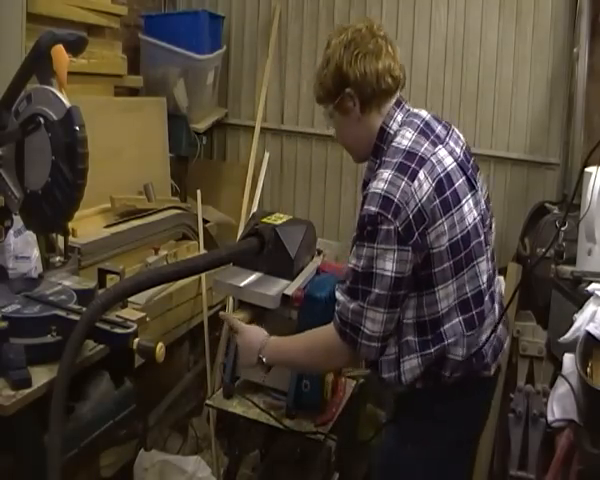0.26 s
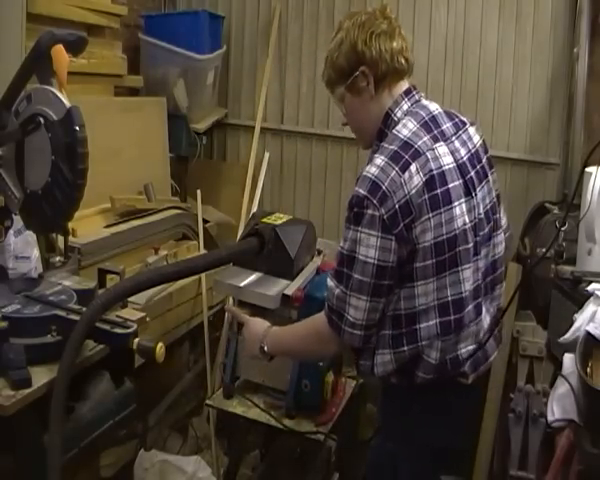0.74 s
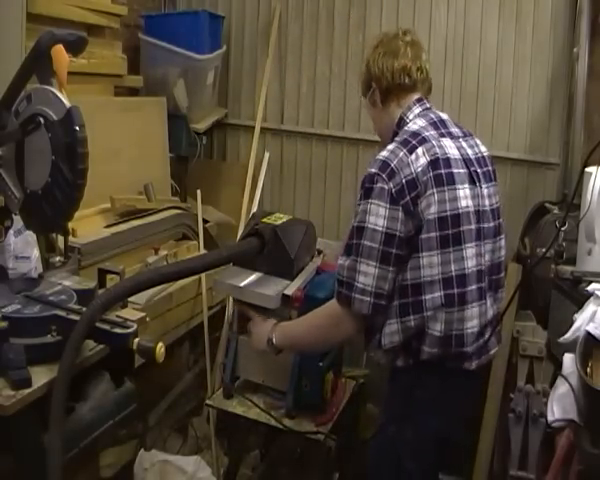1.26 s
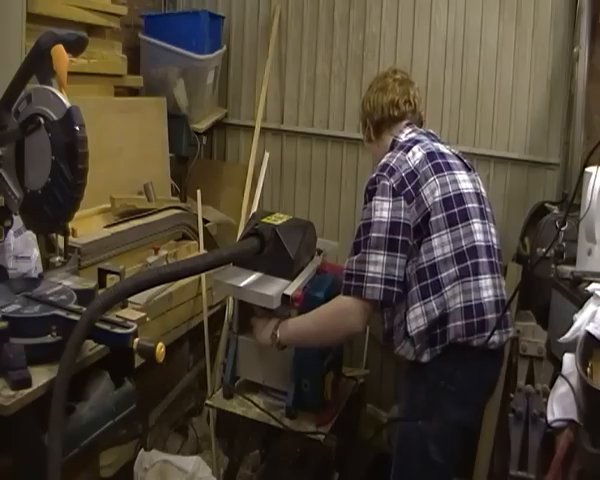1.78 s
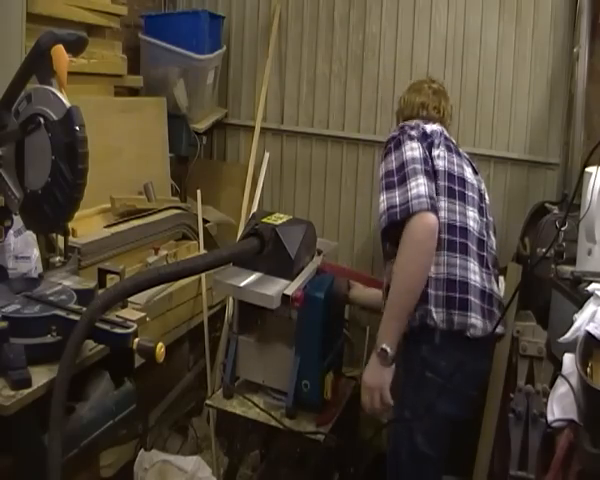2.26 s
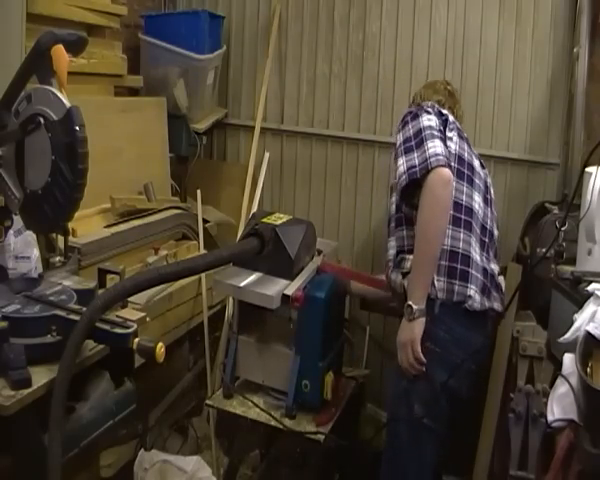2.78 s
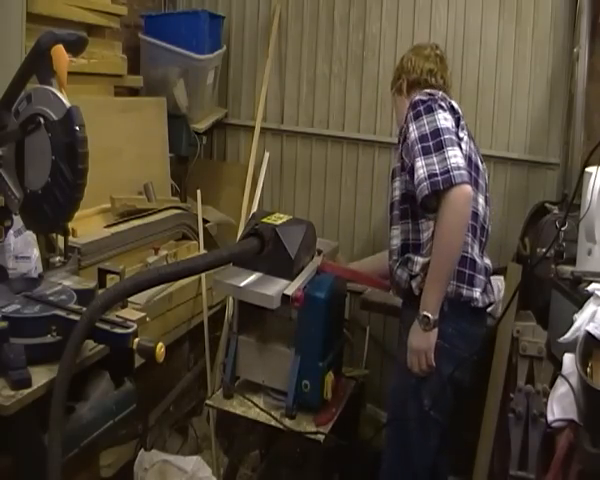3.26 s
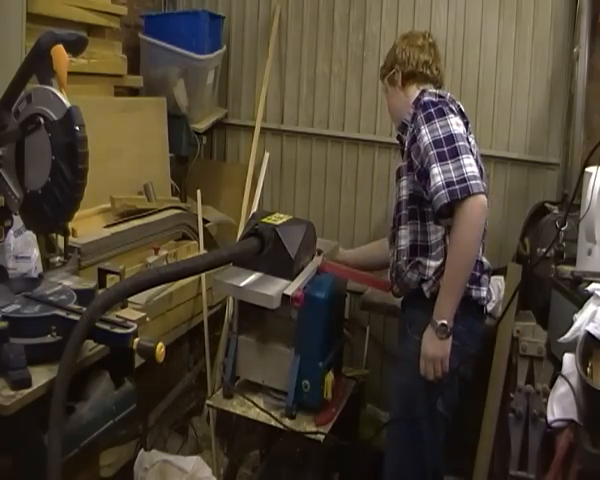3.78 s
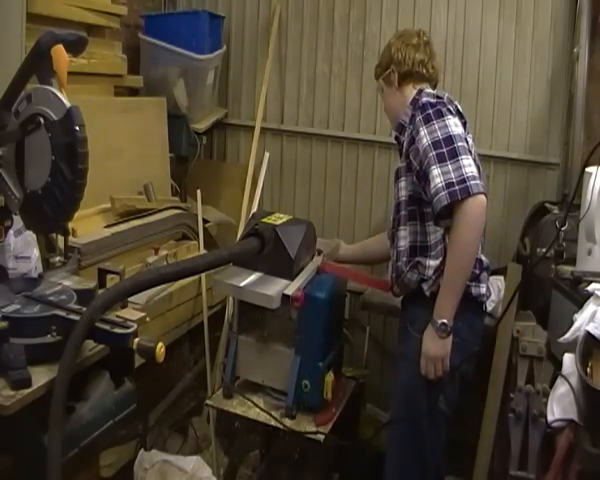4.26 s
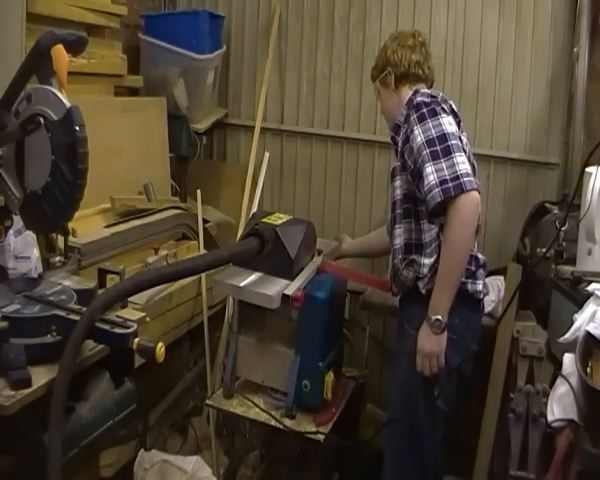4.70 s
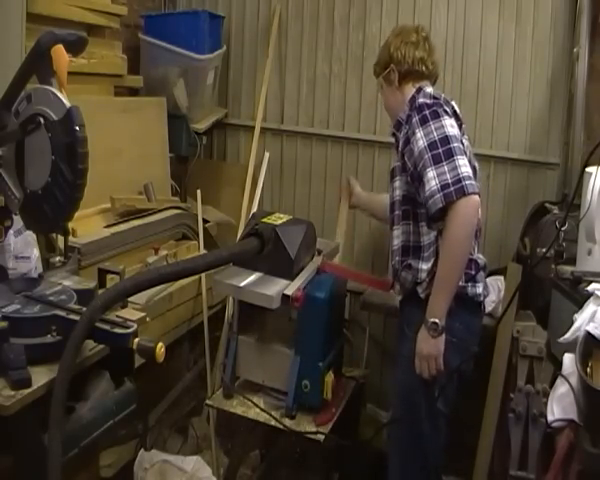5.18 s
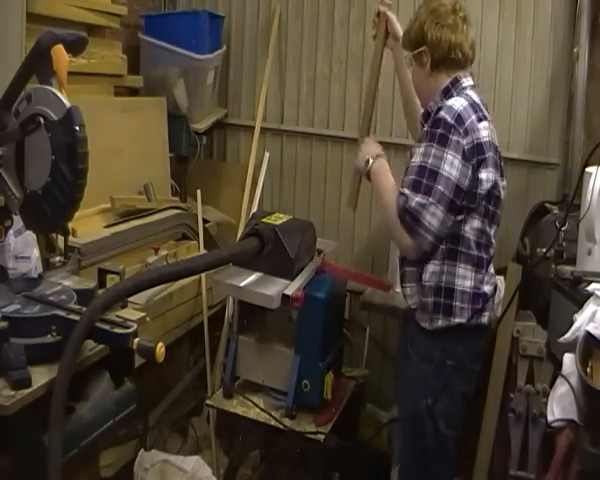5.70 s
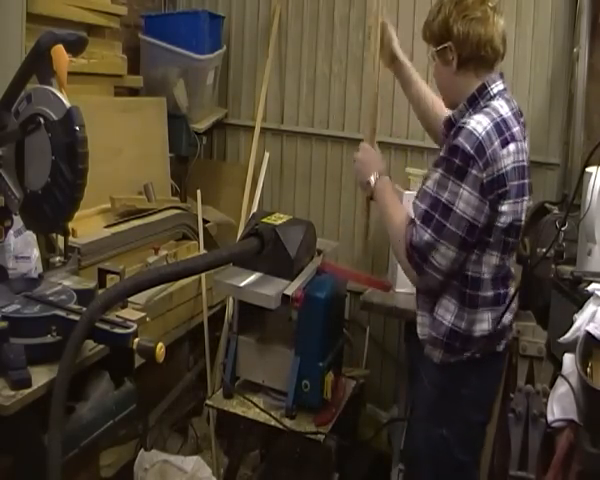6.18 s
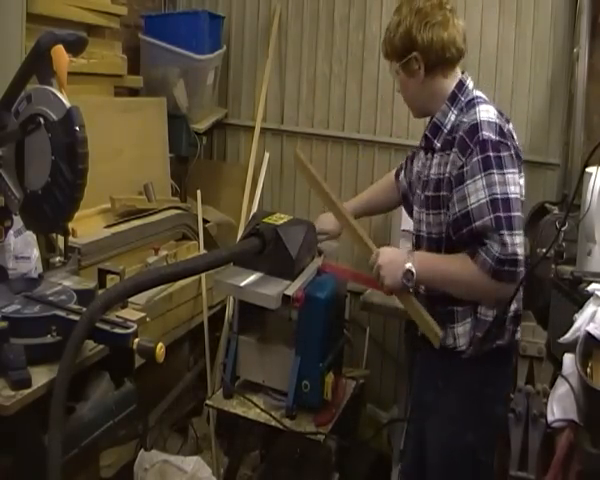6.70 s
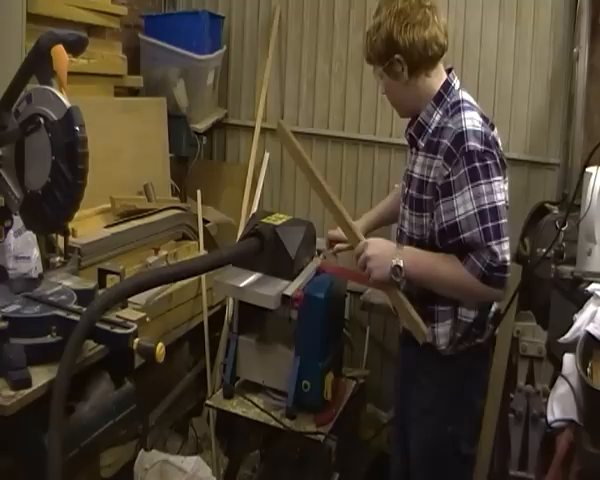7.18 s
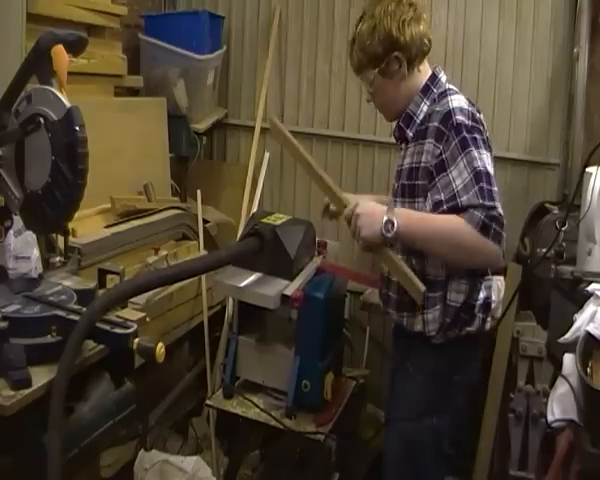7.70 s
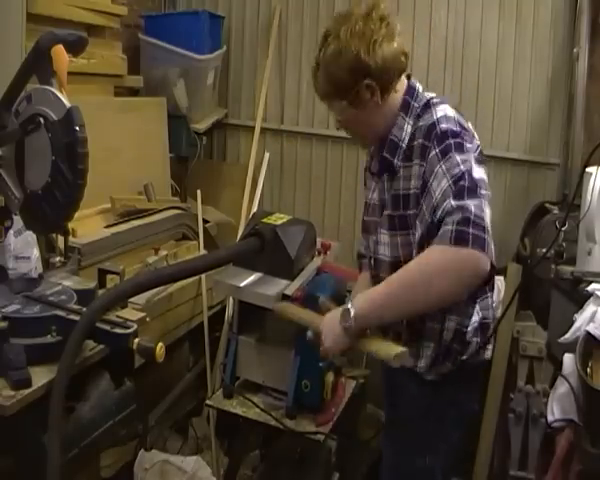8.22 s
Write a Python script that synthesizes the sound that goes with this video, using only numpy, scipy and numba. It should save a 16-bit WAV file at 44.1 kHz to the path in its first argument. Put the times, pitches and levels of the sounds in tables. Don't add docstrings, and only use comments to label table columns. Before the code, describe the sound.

Loud siren-like planer howl and steady vacuum hum with rushing air; wood buzzes raspily under the knives, stops, and the pitch climbs to a clear whine.

```python
import sys
import numpy as np
from scipy import signal
from scipy.fft import rfft, irfft, next_fast_len
from scipy.io import wavfile
from scipy.ndimage import uniform_filter1d
from numba import njit

SR = 44100
rng = np.random.default_rng(int(sys.argv[2]) if len(sys.argv) > 2 else 0)


def ratio(d):
    e = np.asarray(d, float) / 20
    return 10 ** e


def store_pcm(level_fs):
    pcm = np.round(np.clip(level_fs, -1, 1) * 32767).astype(np.int16)
    wavfile.write(sys.argv[1], SR, np.atleast_2d(pcm).T)


N = 372644
STEP = 64
T = np.arange(N // STEP + 2) * STEP / SR
FREE_HZ = 169.78


def planer():
    hz, cut = speed(), cutting()
    siren_db = siren_levels(hz)
    lines = siren(hz, siren_db) + belt() + blows(hz, cut, siren_db[8])
    block, turn = tones(hz, lines)
    return block + motor(hz), turn, full(cut)


# gripped_s, let_go_s, drag_hz
STRIPS = [
    (-9, 3.381, 10.3),
    (3.349, 4.765, 12.35),
]


def speed():
    lag_s, grip_s = .725, .242
    roller_s, roller_at_s, roller_share = 2.485, .44, .043
    drag = sum(hz * gate(start, end, grip_s) for start, end, hz in STRIPS)
    drag = drag * (1 + roller_share * np.cos(2 * np.pi * (T - roller_at_s) / roller_s))
    k = STEP / SR / lag_s
    return FREE_HZ - signal.lfilter([k], [1, k - 1], drag, zi=[10.])[0]


SPEED_HZ = [159.2, 160.6, 163.0, 164.6, 166.5, 168.1, 168.9, 169.7]


def by_speed(hz, levels_db):
    return np.interp(hz, SPEED_HZ, levels_db)


# time_s, length_s, multiple, level_db
SHADES = [
    (2.03, 1.66, 4, -8.5),
    (3.17, 0.92, 4, -3.5),
    (4.1, 0.76, 4, -4),
    (1.28, .6, 6, -5),
    (3.43, 0.24, 6, -4),
    (4.04, 0.94, 6, 2.5),
    (2.9, 1.6, 2, -3.5),
    (4.8, .15, 8, -10),
    (4.63, .5, 32, -9),
]


def shade_db(k):
    return sum(db * bump(s, length) for s, length, multiple, db in SHADES if round(multiple) == k)


SIREN_DB = {2: [-33.5, -38, -43, -30.5, -26, -23, -22.5, -22], 4: [-22.5, -25, -20, -19, -20, -23, -19.5,
            -18], 6: [-22, -24, -31, -25.5, -24.5, -21.5, -19.5, -22], 8: [-39.5, -38, -29.5, -34, -28.5,
            -26, -31, -34.5]}


def siren_levels(hz):
    return {k: by_speed(hz, levels) + shade_db(k) for k, levels in SIREN_DB.items()}


def siren(hz, siren_db):
    skew_turns_per_hz = .01
    lines = [(k, -1j * wander(siren_db[k], wander_db=0.4, turns=0.03, rate=18)) for k in (2, 4, 6, 8)]
    skew = np.exp(2j * np.pi * skew_turns_per_hz * (FREE_HZ - hz))
    lines[0] = (2, lines[0][1] * skew)
    return lines + [unbalance(hz)]


UNBALANCE_DB = [-46.5, -44, -42, -40, -40, -44, -45.5, -46]


def unbalance(hz):
    return 1, wander(by_speed(hz, UNBALANCE_DB), wander_db=2.2, turns=.08, rate=17)


# multiple of the block speed, level_db
IDLE = [
    (3.03, -43),
    (4.37, -44),
    (4.95, -46),
    (5.84, -41),
]


def belt():
    return [(k, wander(db, wander_db=0.0, turns=0.069, rate=11)) for k, db in IDLE]


# enter_s, leave_s, typical multiple level_db, extra at the loose tail end level_db
BITES = [
    (-1.5, 3.3, -37, -10),
    (3.5, 4.74, -38, 10.5),
]


def bite_gate(enter, leave):
    return gate(enter, leave, 0.023)


def cutting():
    tail_s = 0.072
    cut = 0
    for enter, leave, db, tail_db in BITES:
        tail = np.exp(np.minimum(T - leave, 0) / tail_s)
        cut = cut + bite_gate(enter, leave) * ratio(db + tail_db * tail)
    return cut


# pitch_hz, level_db
BLOW = [(300, -5), (480, -42), (800, -4), (1100, 2.5), (1400, 3.5), (2300, 1.5), (3200, 2.5), (4000, 4.5),
        (5300, 2), (5900, -2.5), (7800, -1.5)]
EDGES = {3: -45, 12: -41, 16: -37.5, 19: -39, 20: -55, 22: -44, 26: -46}
SINGS = [
    {5: -34.5, 7: -38, 10: -38, 11: -39, 12: -38.5, 15: -33.5, 16: -42.5, 18: -38, 20: -39},
    {5: -36.5, 9: -36, 10: -36, 13: -38, 14: -41, 20: -33, 23: -42, 25: -39, 29: -40},
]
# time_s, length_s, multiple, level_db
RINGS = [(4.2, .35, 27, -32), (0.075, 0.42, 13, -25.5), (1.65, .35, 15, -28.5), (0.55, 1.3, 20, -33),
         (0.43, 1.1, 16, -26.5), (0.71, 1.3, 13, -31), (0.834, 0.3, 14, -20), (0.57, 0.32, 34, -26.5),
         (1.4, .5, 16, -31), (1.94, 0.69, 12, -30), (2.3, 0.32, 18, -38), (1.1, 0.54, 34, -30),
         (2.82, 0.45, 16, -29), (3.58, 0.13, 27, -29), (4.08, 0.36, 34, -29), (4.53, .35, 10, -27),
         (4.12, .45, 7, -31), (4.68, 0.15, 16, -23), (3.69, .2, 20, -21.5), (3.71, 0.18, 32, -24),
         (3.88, 0.74, 16, -28), (4.106, 0.37, 17, -21), (4.12, 0.87, 12, -23), (4.28, 0.38, 21, -24.5),
         (4.32, 0.74, 15, -23), (4.38, 0.19, 19, -20.5), (4.62, .34, 22, -25.5), (4.604, 0.31, 12, -25.5),
         (4.65, .32, 17, -20.5), (4.64, 0.26, 20, -23)]


def blows(hz, cut, eighth_db):
    lines = []
    spread_turns = .23 * np.maximum(np.arange(49) / 18, 1) ** 2
    spread = np.cumsum(spread_turns * rng.standard_normal(49))
    for k in sorted(set(range(3, 49)) - {4, 6, 8}):
        fade = .5 + 0.35 * np.clip(walk(5), -2, 2) ** 2
        power = (cut * ratio(at(BLOW, k * hz.mean()) - 4.5)) ** 2 * fade
        edge_db = eighth_db - 6.0 if k == 10 else EDGES.get(k, -90)
        power += ratio(2 * edge_db)
        mood_db = 3.5 * walk(2.44)
        for sings, bite in zip(SINGS, BITES):
            power += (ratio(sings.get(k, -90) + mood_db) * bite_gate(*bite[:2])) ** 2
        for s, length, multiple, db in RINGS:
            if round(multiple) == k:
                contact = np.minimum(cut / ratio(-37), 1)
                power += ratio(2 * db) * bump(s, length) ** 2 * contact ** 2
        level = np.sqrt(power) * (power > 1e-8)
        drift = wander(0, wander_db=1.64, turns=0.059, rate=26)
        lines.append((k, level * drift * np.exp(2j * np.pi * spread[k])))
    return lines


BARS_DB = [-32.5, -31.5, -38, -38, -35, -39, -33, -36]


def motor(hz):
    bars_per_turn, slip_per_hz = 31.89, .007
    bars_hz = hz * (bars_per_turn + slip_per_hz * (FREE_HZ - hz))
    bars_db = by_speed(hz, BARS_DB) + shade_db(32)
    return tones(bars_hz, [(1, wander(bars_db, wander_db=1.5, turns=.06, rate=18))])[0]


# pitch_hz, peak level_db, time to fall 60 dB decay_s
KNOCK = [
    (1310, -20, .09),
    (1480, -25, .06),
    (2600, -29, .04),
]


def knock():
    t = np.maximum(np.arange(N) / SR - 5.4, 0)
    return sum(ratio(db - 60 * t / t60) * np.sin(2 * np.pi * hz * t) for hz, db, t60 in KNOCK)


# time_s, level_db
VACUUM = [
    (0, -24),
    (.6, -23),
    (4.3, -23.5),
    (4.68, -26),
    (5.0, -22.5),
    (5.3, -23.5),
    (6.4, -25.5),
    (8.45, -24),
]
# multiple of the hum, level_db
FAN = [(3, -44.5), (6, -35.5), (12, -46)]


def vacuum():
    sag_share, drift_from_s, drift_hz_per_s = .195, 6.0, -.5
    hz = 387.75 - sag_share * (FREE_HZ - speed())
    hz = hz + drift_hz_per_s * np.maximum(T - drift_from_s, 0)
    lines = [(1, wander(curves(VACUUM)[0], wander_db=-1.6, turns=0.023, rate=12))]
    lines += [(k, wander(db, wander_db=1.3, turns=0.045, rate=12)) for k, db in FAN]
    return tones(hz, lines)[0]


# pitch_hz, level_db per Hz
ROAR = [(25, -35), (90, -31), (130, -18.5), (200, -12), (290, -8), (360, 2.5), (500, -5), (680, 1.5),
        (1200, 0.5), (2500, -0.5), (3300, 2), (4500, 2), (5500, -2.5), (6500, -13), (9000, -44)]
# pitch_hz, level_db per Hz
HISS = [(4000, -9.5), (5500, -7), (6500, -6.5), (8500, -4), (10500, -5), (11500, -7.5), (12000, -15)]
# time_s, level of all the air level_db, left minus right of the whole scene level_db
AIR = [(0, -24, .3), (.45, -23, 0.5), (.75, -24.5, 0.4), (3.3, -24, 0), (3.55, -22.5, 0), (4.28, -22.5, .5),
       (4.55, -25.5, 2.5), (4.8, -26, -0.5), (5.0, -24, 1.5), (6.2, -23.5, 2), (6.95, -25, -1.5),
       (7.15, -25, -0.3), (8.45, -25, 0.2)]


def air(turn, cut):
    puff = 1 + 0.028 * np.minimum(cut / ratio(-23), 1) * (np.cos(turn) + np.cos(2 * turn))
    roar = rush(ROAR, puff, flicker_db=0.43) * ratio(13.5)
    hiss = rush(HISS, puff, flicker_db=0.2) * ratio(14.5)
    return (roar + hiss) * ratio(full(curves(AIR)[0]) - 4)


# pitch_hz, side minus mid level_db
WIDE = [(60, -10), (110, -13), (200, -11), (350, -19.5), (640, -21), (1150, -17), (2070, -14), (3730, -15),
        (6730, -11), (12100, -10.5)]


def rush(points, shape, flicker_db):
    room_t60_s, room_db, top_hz = 0.36, -9, 12100
    size = next_fast_len(N)
    hz = np.arange(size // 2 + 1) * SR / size
    tail_s = np.arange(SR // 2) / SR
    tail = rng.standard_normal(SR // 2) * np.exp(-np.log(1000) * tail_s / room_t60_s)
    room = 1 + ratio(room_db) * rfft(tail / np.sqrt(np.sum(tail ** 2)), size)
    noise = rfft(rng.standard_normal((2, N)) * shape, size)
    mid, side = noise * ratio(at(points, hz)) * (hz < top_hz)
    pair = np.array([mid * room, side * ratio(at(WIDE, hz) + 4.0)])
    octave = np.log2(np.maximum(hz, 25) / 25)
    out, swell = 0, walk(3)
    for band in range(int(np.log2(points[0][0] / 25)), 10):
        share = np.clip(1 - abs(octave - band), 0, 1)
        flicker = full(ratio(flicker_db * (swell + walk(9))))
        out = out + irfft(pair * share, size)[:, :N] * flicker
    return np.array([out[0] + out[1], out[0] - out[1]])


def tones(hz, lines, side_db=-3):
    turn = 2 * np.pi * np.cumsum(full(hz)) / SR
    multiples = np.array([1. * k for k, _ in lines])
    mid = np.sqrt(2) * np.array([gain + 0j for _, gain in lines])
    side = []
    for k in multiples:
        phase = rng.uniform(0, 2 * np.pi) + walk(2.495)
        side.append(ratio(at(WIDE, k * hz.mean()) + side_db) * np.exp(1j * phase))
    side = np.array(side)
    return partials(turn, multiples, mid * (1 + side), mid * (1 - side), STEP), turn


@njit
def partials(turn, multiples, left, right, step):
    out = np.zeros((2, len(turn)))
    for k in range(len(multiples)):
        for i in range(len(turn)):
            j, part = i // step, (i % step) / step
            if left[k, j] != 0:
                wave = np.exp(1j * multiples[k] * turn[i])
                out[0, i] += (wave * (left[k, j] + part * (left[k, j + 1] - left[k, j]))).imag
                out[1, i] += (wave * (right[k, j] + part * (right[k, j + 1] - right[k, j]))).imag
    return out


def wander(db, wander_db, turns, rate):
    level = ratio(db + wander_db * np.clip(walk(rate), -2, 2))
    return level * np.exp(2j * np.pi * turns * walk(rate))


def walk(rate):
    size = int(SR / STEP / np.clip(rate, .5, 40))
    knots = np.repeat(rng.standard_normal(400), size)[:len(T)]
    return 1.5 * uniform_filter1d(uniform_filter1d(knots, size), size)


def gate(start, end, ramp):
    return np.clip(np.minimum(T - start, end - T) / ramp, 0, 1)


def bump(s, length):
    return np.exp(-6 * ((T - s) / length) ** 2)


def curves(table):
    s, *columns = np.transpose(table)
    return [np.interp(T, s, c) for c in columns]


def full(slow):
    return np.interp(np.arange(N) / SR, T, slow)


def at(points, hz):
    f, db = np.transpose(points)
    return np.interp(np.log(np.maximum(hz, 1)), np.log(f), db)


def scene():
    knives, turn, cut = planer()
    pan_db = full(curves(AIR)[1])
    mix = knives + knock() + vacuum() + air(turn, cut)
    return mix * ratio(np.array([pan_db, -pan_db]) / 2)


def top_cut(x):
    return signal.sosfilt(signal.butter(12, 12100, fs=SR, output="sos"), x)


def record(dry):
    mix = np.clip(dry, -.95, .95)
    return top_cut(mix)


dry = scene()
out = record(dry)
store_pcm(out)
```